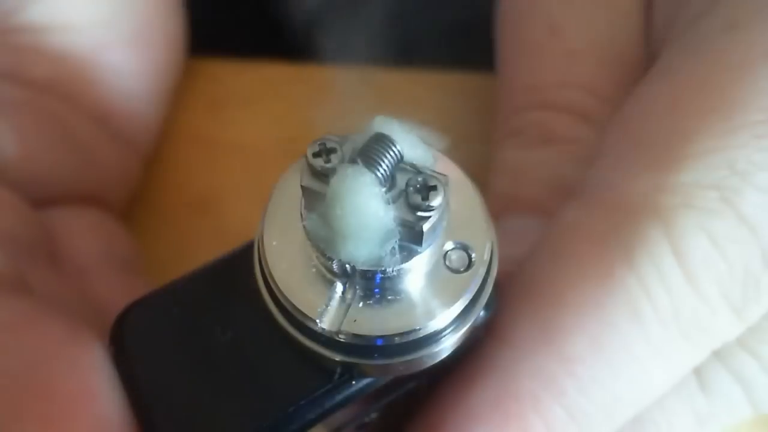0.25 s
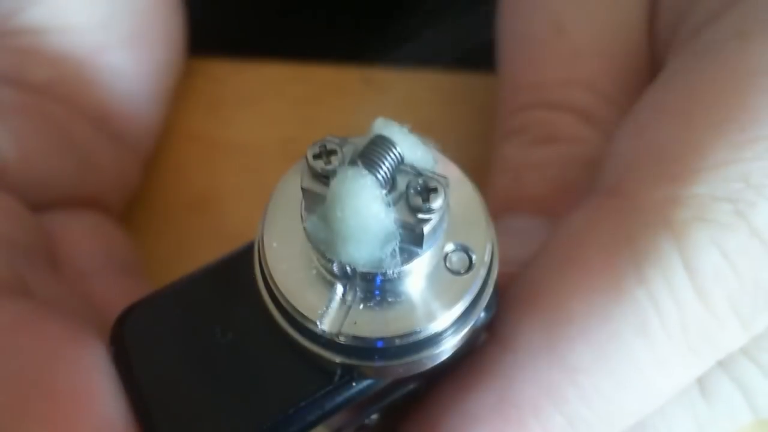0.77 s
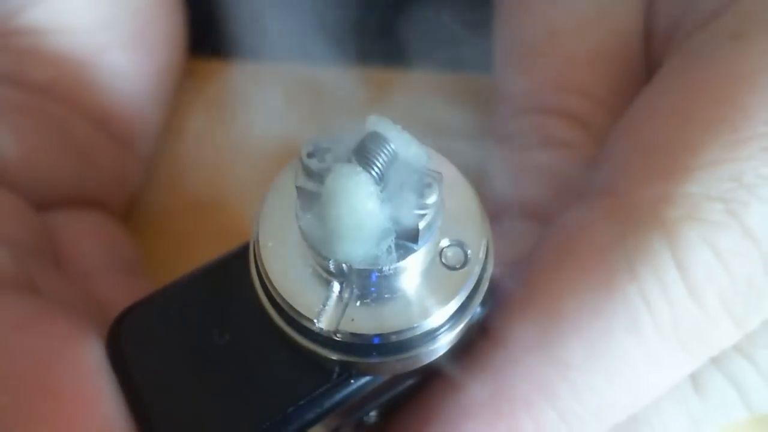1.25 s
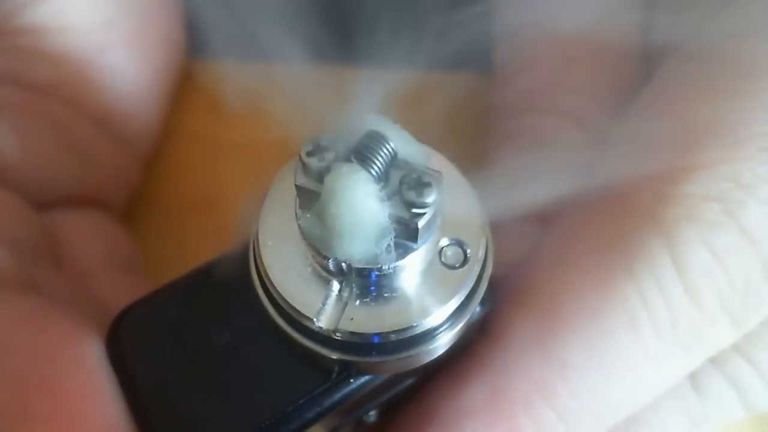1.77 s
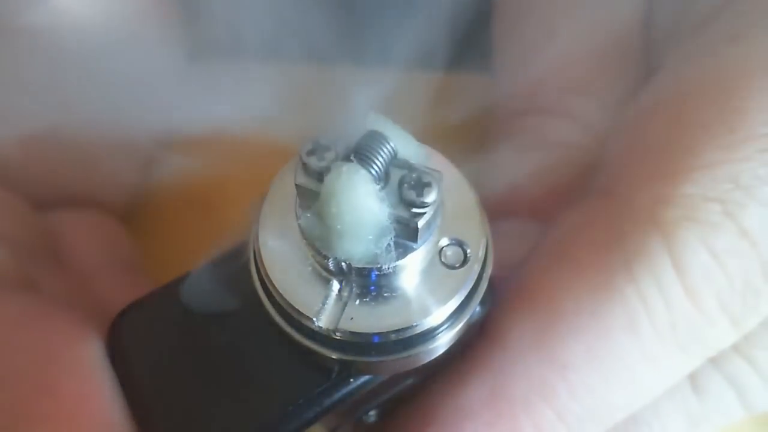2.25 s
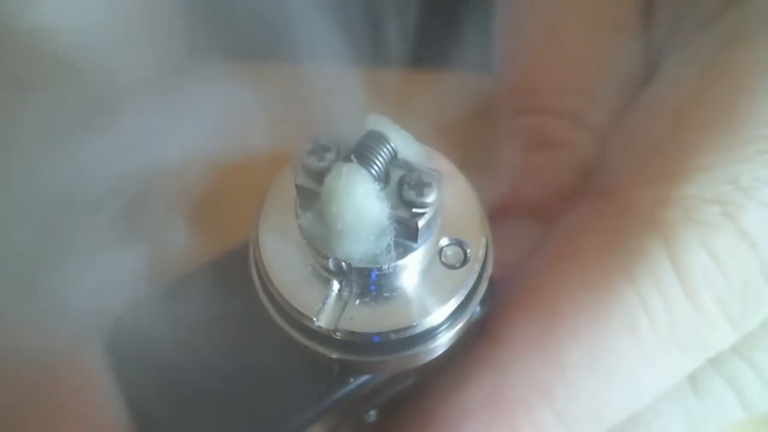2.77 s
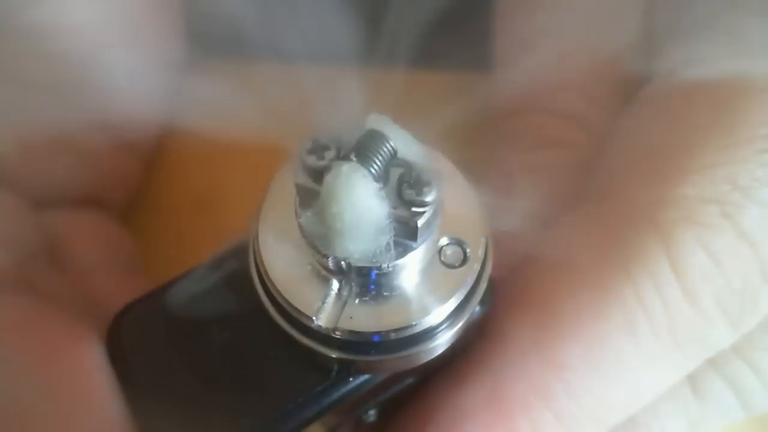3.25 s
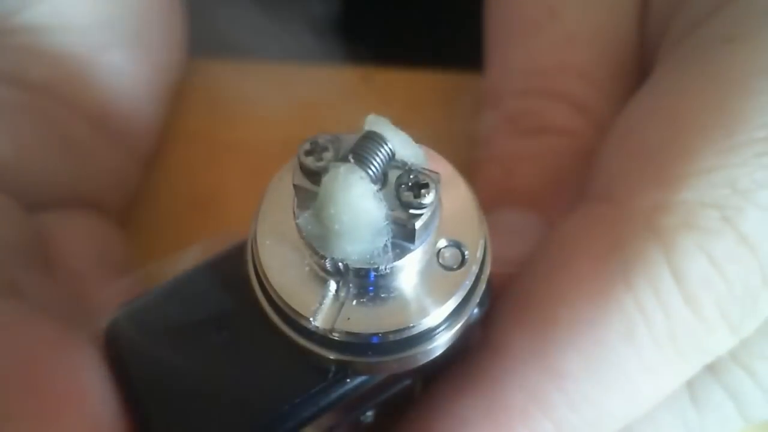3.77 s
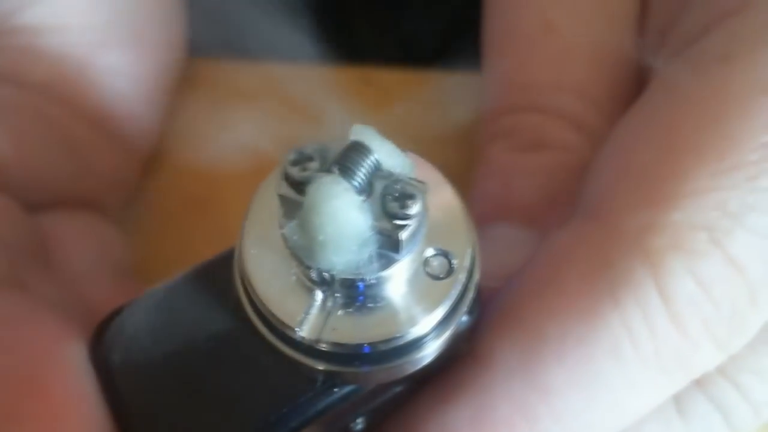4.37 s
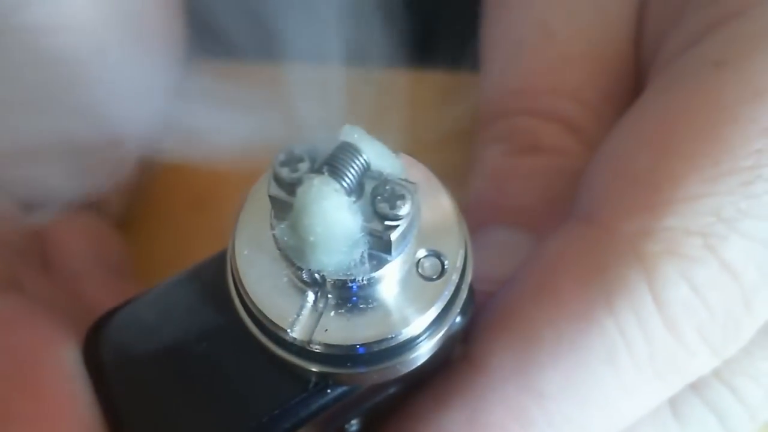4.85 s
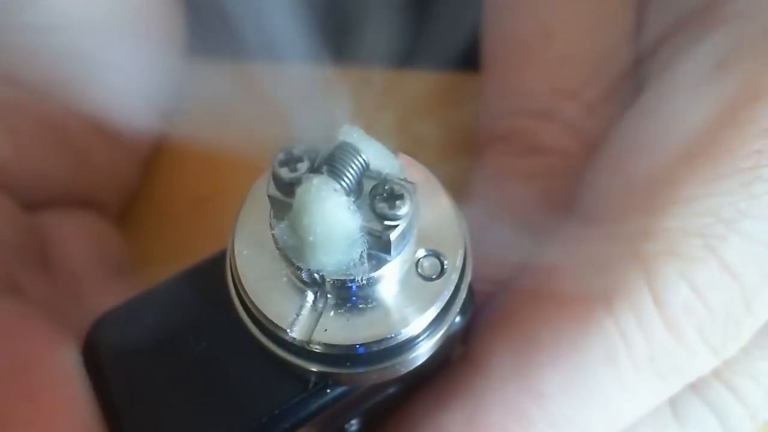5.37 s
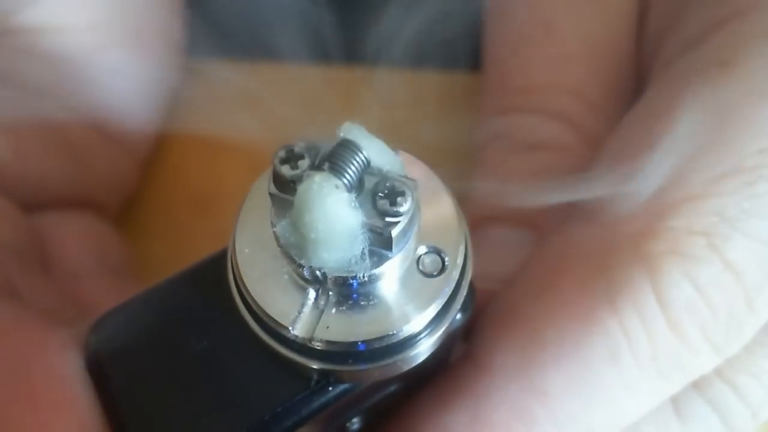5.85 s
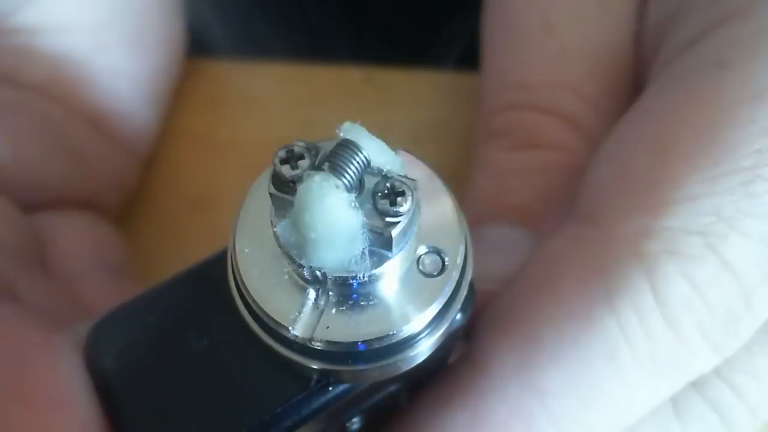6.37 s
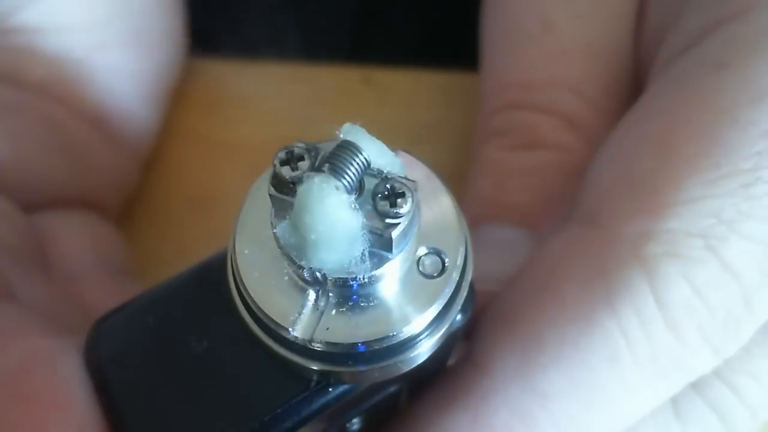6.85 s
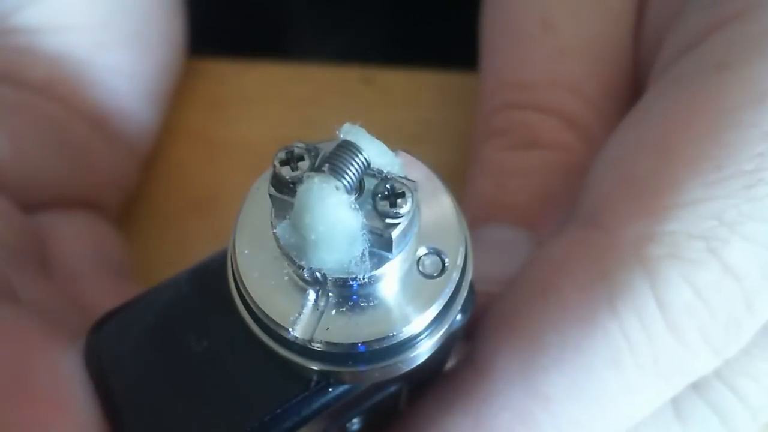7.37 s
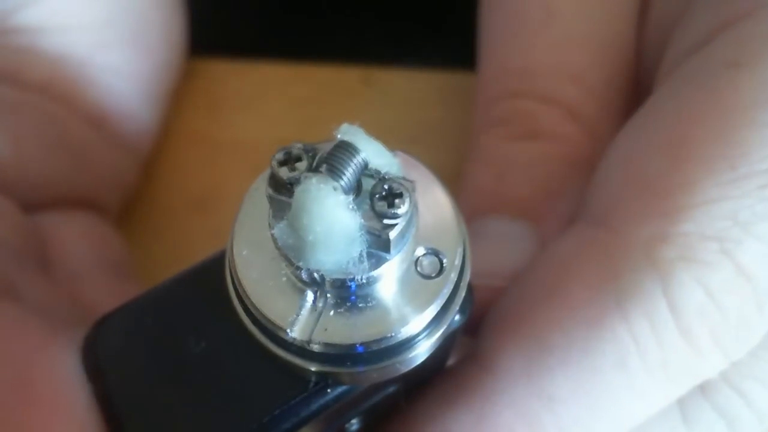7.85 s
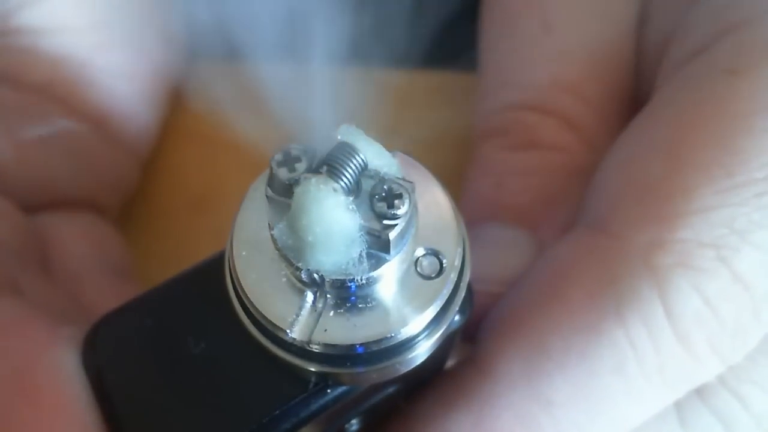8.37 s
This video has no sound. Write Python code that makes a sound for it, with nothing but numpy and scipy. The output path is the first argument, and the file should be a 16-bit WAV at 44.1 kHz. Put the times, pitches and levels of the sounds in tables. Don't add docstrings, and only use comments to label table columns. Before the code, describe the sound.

Extremely close and dry, with a small-camera sound: soft room hiss, low fan hum and a faint, very high whine pulsing rapidly throughout. At 0 s an earlier sizzle is already dying, thinning to sparse ticks by 1 s. At 1.1 s a soft button click with a tiny metallic ping; the wet coil fizzes up into dense, bright crackling with dull bubble pops and steam. A huge sharp spit cracks at 2.0 s, far louder than the rest; deep draught thuds flutter around 2.3-2.8 s. At 3.4 s the boil collapses to fading simmer and ticks. A duller click at 4.3 s starts a steeper boil, spitting hardest around 5.2-5.8 s, then dropping at 5.85 s into scattered ticks until about 6.4 s. Near-quiet hum and hiss follow. The firmest click comes at 8.0 s; sizzling surges again with quick spits and a low air push, cut off still boiling around 8.6 s.

```python
import sys
import numpy as np
from scipy import signal
from scipy.fft import rfft, irfft
from scipy.io import wavfile
from scipy.ndimage import uniform_filter1d

SR = 44100
rng = np.random.default_rng(int(sys.argv[2]) if len(sys.argv) > 2 else 0)


def persist_wave(psi):
    counts = np.round(np.clip(psi, -1, 1) * 32767).astype(np.int16)
    wavfile.write(sys.argv[1], SR, np.atleast_2d(counts).T)


def decibels_to_gain(level_db):
    exponent = np.asarray(level_db, float) / 20
    return 10 ** exponent


N = 379701


def level(x, db):
    return x * decibels_to_gain(db) / np.sqrt(np.mean(x ** 2))


def causal(points, bells=(), size=4096):
    hz = np.maximum(np.arange(size // 2 + 1) * SR / size, 1)
    point_hz, point_db = np.transpose(points)
    db = np.interp(np.log(hz), np.log(point_hz), point_db)
    for centre_hz, width_hz, bump_db in bells:
        db = db + bump_db / (1 + (2 * (hz - centre_hz) / width_hz) ** 2)
    cepstrum = irfft(np.log(decibels_to_gain(db)))
    cepstrum[1:size // 2] *= 2
    cepstrum[size // 2 + 1:] = 0
    return irfft(np.exp(rfft(cepstrum)))[:size // 2]


def through(x, response):
    return signal.fftconvolve(x, response)[:N]


def band(x, hz, kind, order=2):
    return signal.sosfilt(signal.butter(order, hz, kind, fs=SR, output="sos"), x)


def walk(rate):
    hold = int(SR / rate)
    steps = np.repeat(rng.standard_normal(N // hold + 1), hold)
    return 0.51 * uniform_filter1d(uniform_filter1d(steps, hold), hold)[:N]


def room():
    # frequency in Hz, density in dB per Hz
    air_spectrum = [(20, -13.5), (60, -13.5), (150, -16.5), (330, -15), (560, -22.5), (1000, -24),
                    (1450, -20.5), (2100, -33.5), (3600, -36), (9000, -37), (13000, -37.5), (15800, -35.5)]
    # frequency in Hz, level in dB rms
    hums = [(120.5, -58.5), (367.4, -52), (446.8, -65), (1084, -68.5), (1470, -67.5), (3891.5, -71),
            (6750.1, -73), (8001, -74), (10125.5, -101), (11673, -77), (14315, -96)]
    frame_hz, read_start_s, read_s, line_hz = 15, .0527, .0548, 13500.3
    slip_first_s, slip_every_s, slip_s = .33, .4995, .00096

    t = np.arange(N) / SR
    air = level(through(rng.standard_normal(N), causal(air_spectrum)), -48.5)
    drops = np.floor((t - slip_first_s) / slip_every_s + 1).astype(int)
    jitter = rng.random(drops[-1] + 1) / line_hz
    clock = t + slip_s * drops + jitter[drops]
    tones = np.zeros(N)
    for hz, db in hums:
        waver = decibels_to_gain(db + 1.5 * walk(3.6))
        tones += waver * np.sqrt(2) * np.sin(2 * np.pi * (hz * clock + rng.random()))
    reading = (clock - read_start_s) % (1 / frame_hz) < read_s
    reading = uniform_filter1d(reading.astype(float), 40)
    whine = decibels_to_gain(-52.5) * reading * np.sin(2 * np.pi * line_hz * clock)
    return air + tones + whine


def draught():
    # peak in seconds, level in dB, fall either side in dB per second
    gusts = [(0.0, -36, 70), (2.33, -33, 110), (2.55, -28, 150), (2.74, -32, 80), (3.15, -40, 60),
             (3.35, -36, 250), (3.7, -40, 120), (4.11, -42, 90), (4.94, -46, 100), (5.56, -43, 60),
             (6.95, -49, 50), (8.61, -31, 55)]
    t = np.arange(N) / SR
    push = band(band(rng.standard_normal(N), 7.2, "low"), 4.5, "high")
    strength = decibels_to_gain(-58)
    for s, db, fall_db_s in gusts:
        strength = strength + decibels_to_gain(db - fall_db_s * np.abs(t - s))
    return level(push, 0) * strength


def button():
    # start in seconds, peak in dB, thump and ping in relative dB
    presses = [
        (1.1062, -31, 1.5, -2.5),
        (4.3101, -28, 0, -8.5),
        (8.0256, -25, -1.5, -2.5),
    ]
    # frequency in Hz, level in dB, 60 dB decay in seconds
    modes = [(174, -5, 0.012), (400, -10, 0.031), (590, -5, 0.007), (970, -5, 0.0063), (1760, -1, 0.012),
             (2220, -1, 0.0083), (2780, -3, 0.0053), (4360, -15, 0.0066), (6000, 2, 0.008),
             (7510, 5, 0.015), (10700, -13, .005)]
    out, t = np.zeros(N), np.arange(SR // 20) / SR
    bounce = np.zeros(100)
    bounce[[0, 74]] = 1.1, .5
    for s, peak_db, thump_db, ping_db in presses:
        thump, ring = np.zeros((2, len(t)))
        for k, (hz, db, t60) in enumerate(modes):
            hz = hz * (1 + .01 * rng.standard_normal())
            sign = (-1) ** k
            wave = np.sin(2 * np.pi * hz * t)
            decay_db = -60 * t / t60
            if hz < 1500:
                thump -= sign * decibels_to_gain(db + thump_db + 10.5 + decay_db) * wave
            else:
                ring += sign * decibels_to_gain(db + ping_db * (hz > 4000) + decay_db) * wave
        onset = np.minimum(t / 0.00012, 1)
        ring = np.convolve(ring * onset, bounce)[:len(t)]
        i = int((s + .0006) * SR)
        out[i:i + len(t)] += decibels_to_gain(peak_db - 2) * (ring + thump)
    return out


def boil(on, off, climb_db_s, simmer_db, fade_db_s, quench_s):
    t = np.arange(N) / SR
    heated = np.clip(t, on, off) - on
    cooled = np.maximum(t - off, 0)
    simmer = decibels_to_gain(simmer_db)
    swell = (1 - np.exp(-heated / .18)) * decibels_to_gain(climb_db_s * heated)
    return swell * ((1 - simmer) * np.exp(-cooled / quench_s) + simmer * decibels_to_gain(-fade_db_s * cooled))


def boil_levels():
    # power on and off in seconds, climb in dB per second,
    # simmer left at power off in dB, simmer fade in dB per second
    firings = [
        (-2.0, -0.09, 2.5, -10.5, 16.5),
        (1.12, 3.37, 2.65, -14, 12),
        (4.33, 5.845, 5, -18.5, 7),
        (8.07, 9.0, 3.5, -13, 12),
    ]
    fizz, body = np.zeros((2, N))
    for row in firings:
        on, off = row[:2]
        fizz += boil(*row, quench_s=.056)
        body += boil(on, off, climb_db_s=1.0, simmer_db=-12, fade_db_s=15, quench_s=.075)
    return -38.5 + 20 * np.log10(fizz), -39.9 + 20 * np.log10(body)


def bubbles(per_s, spread_db):
    chance = rng.random(N)
    size = np.minimum(rng.exponential(size=N), 4.5)
    kicks = (chance < per_s / SR) * decibels_to_gain(spread_db * size)
    return level(kicks - kicks.mean(), 0)


def burst_response():
    # frequency in Hz, level in dB
    burst_spectrum = [(40, -10), (150, -10), (600, -10.5), (1150, -12), (2300, -11.5), (3000, -14.5),
                      (4400, -7), (6200, -10), (9500, -6.5), (10400, -16.5), (12300, -18), (14500, -26),
                      (15800, -26)]
    # centre and width in Hz, bump in dB
    hollows = [(1500, 280, 7.5), (1715, 320, 7.5), (3190, 610, 4), (3644, 83, -8), (5480, 470, 3),
               (6975, 480, 6.5), (7430, 320, -4), (8350, 550, 6), (10750, 620, -8), (11560, 450, 3.5)]
    return causal(burst_spectrum, hollows)


def sizzle(burst, fizz_db, body_db):
    surge = decibels_to_gain(0.96 * walk(25) + 1.3 * walk(90))
    shared = bubbles(1500, spread_db=3.5)
    either_way = bubbles(2500, spread_db=1.5) * rng.choice([-1, 1], N)
    small = shared + decibels_to_gain(-0.5) * either_way + decibels_to_gain(-2) * rng.standard_normal(N)
    big = shared + decibels_to_gain(-1.5) * bubbles(900, spread_db=3.0) + decibels_to_gain(-6) * rng.standard_normal(N)
    bright = level(through(small * surge, band(burst, 3090, "high")), 1.84)
    dull = level(through(big * surge, band(burst, 2530, "low")), 3.1)
    return bright * decibels_to_gain(fizz_db) + dull * decibels_to_gain(body_db)


def strays(fizz_db):
    per_s = 48
    count = int(per_s * N / SR)
    s = (np.arange(count) + rng.random(count)) / per_s
    size, tone = rng.standard_normal((count, 2)).T
    peak_db = fizz_db[(s * SR).astype(int)] + 15.5 + 3 * np.minimum(size, 1.2)
    return np.transpose([s, peak_db, -10 + 6 * tone])


def spits(burst, fizz_db):
    # start in seconds, peak in dB, dull part in relative dB
    lone_spits = [(1.3438, -19.5, -2), (1.496, -15, -9), (1.9794, 3.5, -10), (2.207, -16, -3),
                  (2.5595, -9, -21), (2.7677, -9, -9), (2.873, -9, -21), (3.0576, -8.5, -18),
                  (3.1057, -10, -21), (3.5373, -22.5, -14), (3.6665, -25, -11), (3.8639, -25.5, -1),
                  (4.5346, -17, -17), (4.8138, -8, -16), (4.854, -11.5, -9), (5.0359, -9, -16),
                  (5.0558, -9, -19), (5.0802, -10, -13), (5.1926, -5, -15), (5.2673, -3.5, -8),
                  (5.6971, -10, -17), (5.7715, -7, -17), (5.8471, -10, -11), (8.3506, -8.5, -22),
                  (8.3884, -8, -12), (8.4528, -10.5, -19.5), (8.486, -7.5, -18), (8.5296, -13, -12),
                  (8.5667, -8.5, -11)]
    # start in seconds, peak in dB, dull part in relative dB
    fat_pops = [(1.5941, -23, 2), (2.3107, -18, 3), (2.7882, -17, 2), (2.886, -13.5, 0.5), (4.4766, -22, 3),
                (4.6285, -20, 4), (4.715, -19.5, 6), (4.8861, -25, 11), (4.9831, -16, 6), (5.0254, -15, 2),
                (5.452, -17, 6), (5.89, -13, 2), (6.0438, -21, -2), (6.3017, -29, 1), (8.136, -25, 0),
                (8.341, -21, 3), (8.4235, -10, 2), (8.5704, -20, 2)]
    # start in seconds, peak in dB
    wick_ticks = [(0.1694, -28), (0.5266, -31), (0.5845, -31), (0.6127, -31), (0.8117, -33), (0.8446, -33),
                  (0.88, -34), (0.9027, -33), (0.9481, -35), (3.4231, -24), (3.507, -21.5), (3.522, -26),
                  (3.556, -24), (3.5758, -22.5), (3.6151, -27), (3.7301, -27), (4.0876, -30), (5.9232, -21),
                  (5.9416, -22), (5.961, -20), (6.0079, -24), (6.0898, -24), (6.1085, -27), (6.1783, -30),
                  (6.3154, -30), (6.394, -29)]
    ticks = [(s, peak_db, -10) for s, peak_db in wick_ticks]
    s, peak_db, dull_db = np.vstack([strays(fizz_db), lone_spits, fat_pops, ticks]).T
    sharp, blunt = np.zeros((2, N))
    at = np.maximum((s - .0001) * SR, 0).astype(int)
    sharp[at] = decibels_to_gain(peak_db - 1.2)
    blunt[at] = decibels_to_gain(peak_db + dull_db + 2.5)
    bright = band(band(burst, 3090, "high"), 16500, "low")
    dull = band(burst, 2300, "low", order=1)
    return through(sharp, bright / np.abs(bright).max()) + through(blunt, dull / np.abs(dull).max())


def coil():
    fizz_db, body_db = boil_levels()
    burst = burst_response()
    boiling = sizzle(burst, fizz_db, body_db) + spits(burst, fizz_db)
    t = np.arange(SR // 20) / SR
    near = rng.standard_normal(len(t)) * decibels_to_gain(-60 * t / 0.0066) * (t > .0006)
    near = near / np.linalg.norm(near)
    return boiling + decibels_to_gain(-22) * through(boiling, near)


def scene():
    return (room() + draught() + button() + coil())[None]


def top_cut(x):
    return signal.sosfilt(signal.butter(12, 16500, fs=SR, output="sos"), x)


def record(dry):
    ceiling, offset = 1.05, -.0604
    cut = signal.ellip(8, .15, 24, 15760, fs=SR, output="sos")
    rounded = ceiling * np.tanh(dry / ceiling)
    return top_cut(signal.sosfiltfilt(cut, rounded) + offset)


dry = scene()
out = record(dry)
persist_wave(out)
```